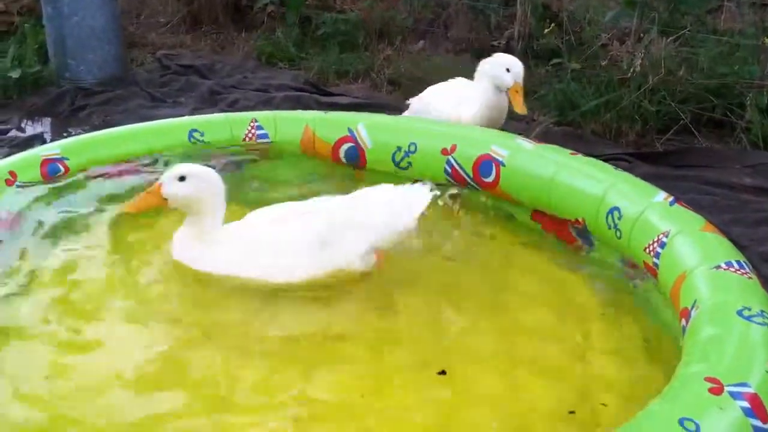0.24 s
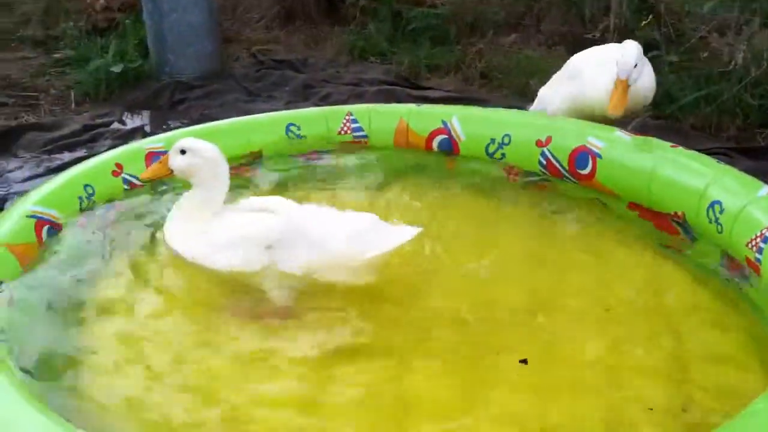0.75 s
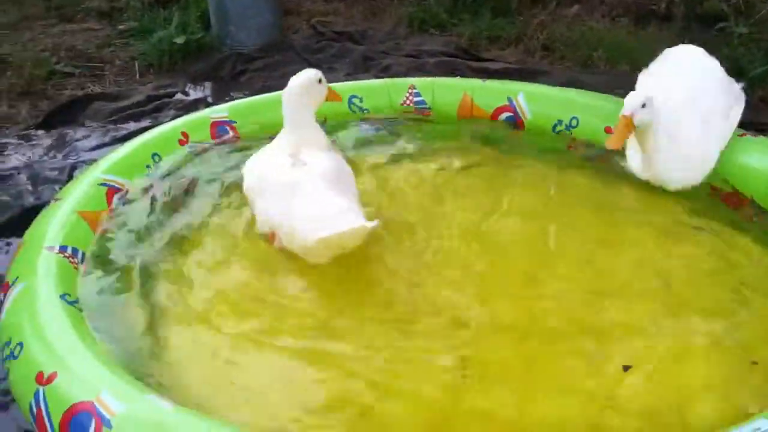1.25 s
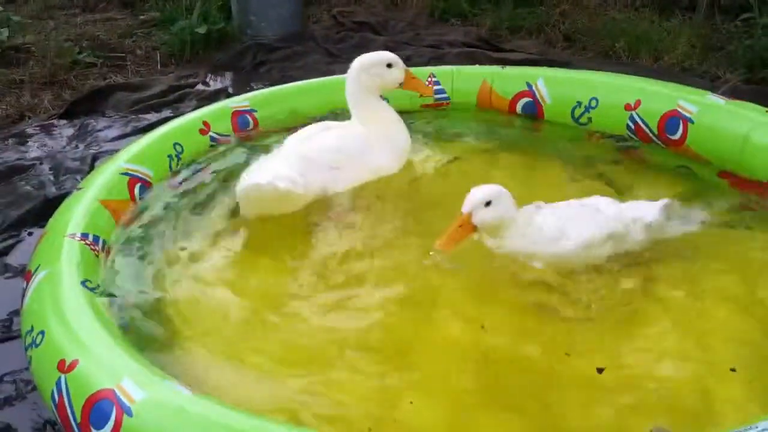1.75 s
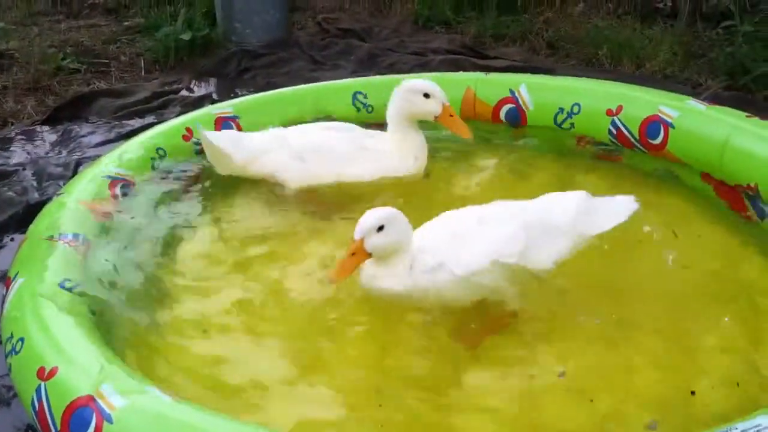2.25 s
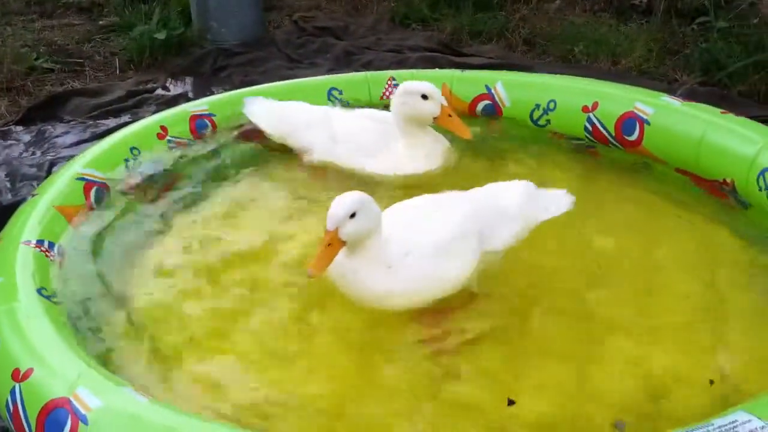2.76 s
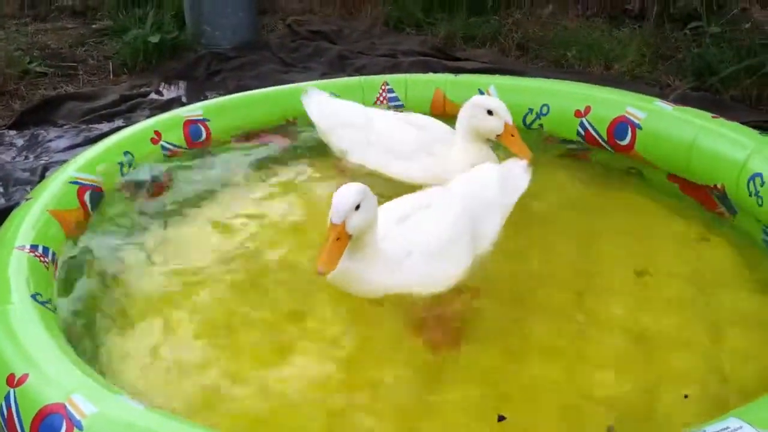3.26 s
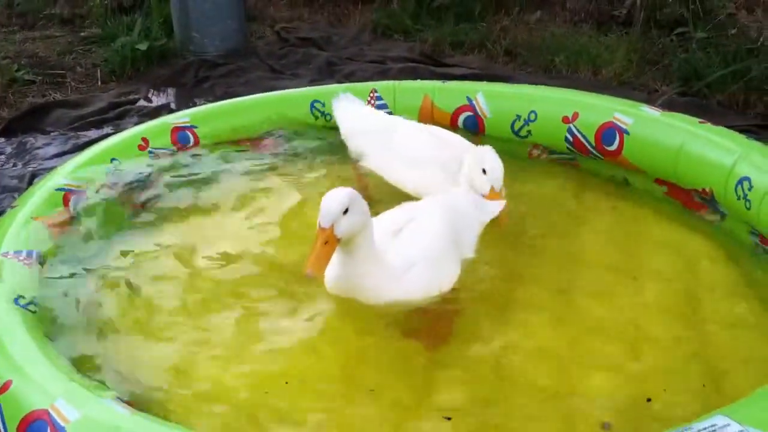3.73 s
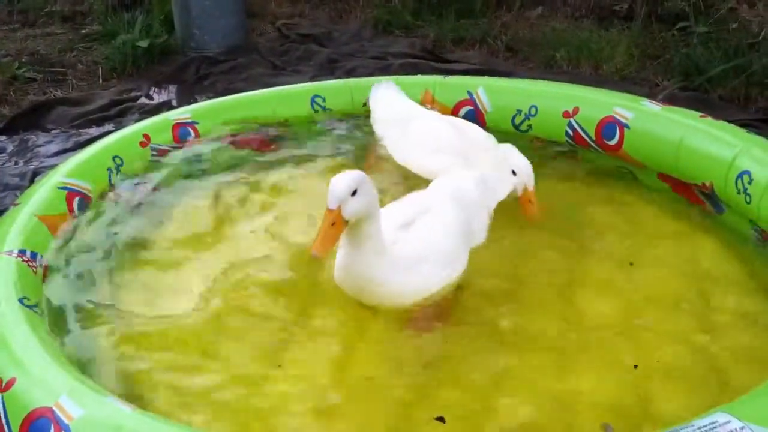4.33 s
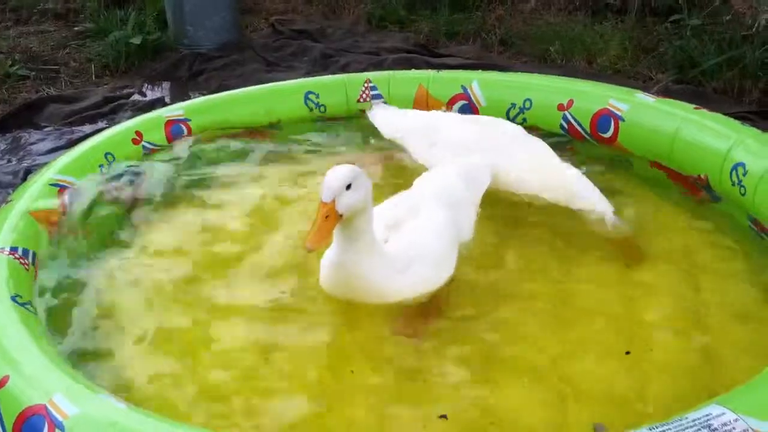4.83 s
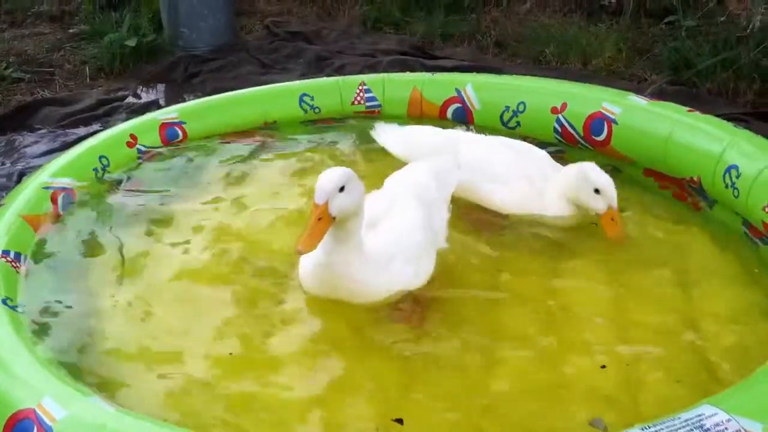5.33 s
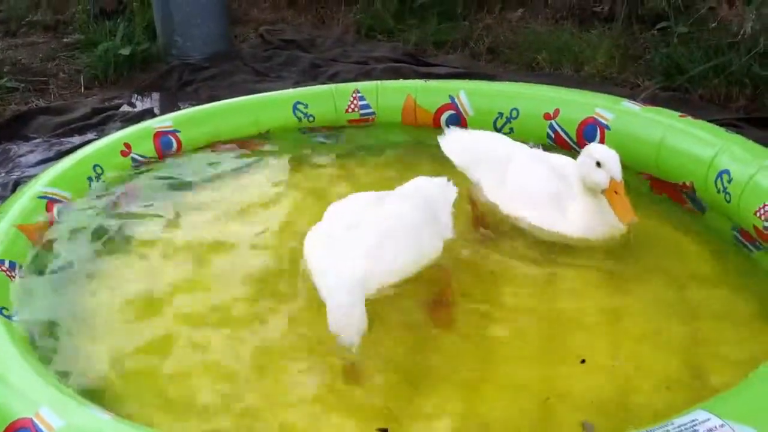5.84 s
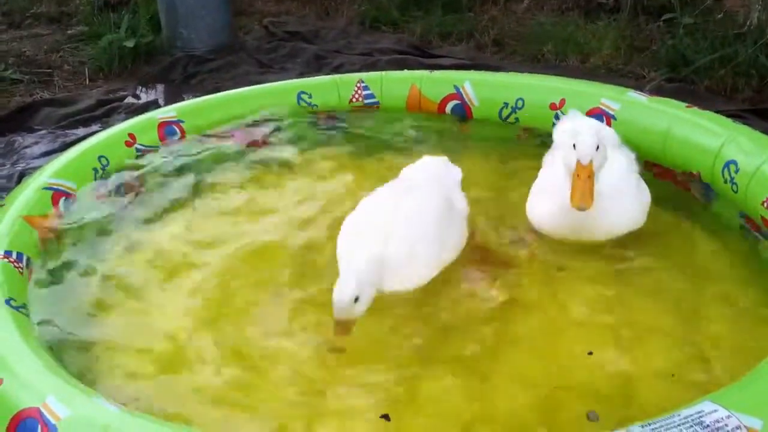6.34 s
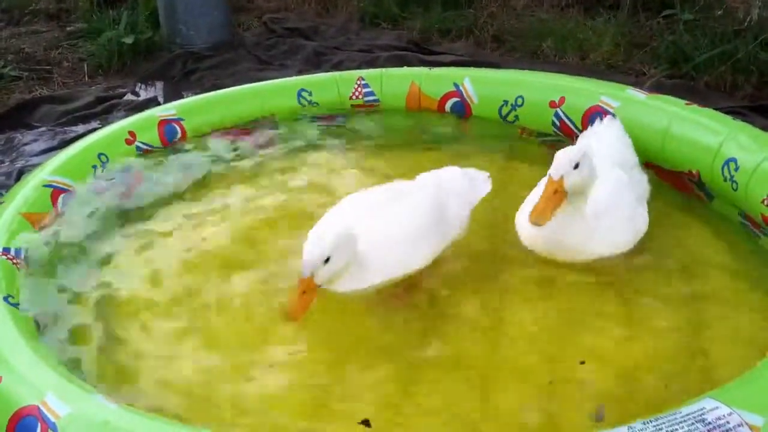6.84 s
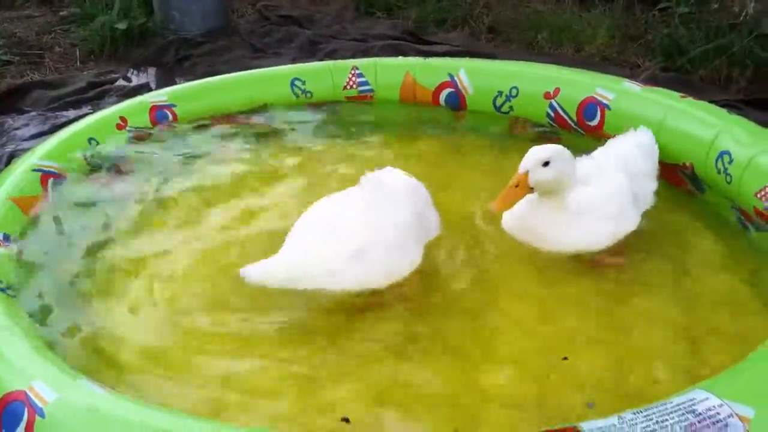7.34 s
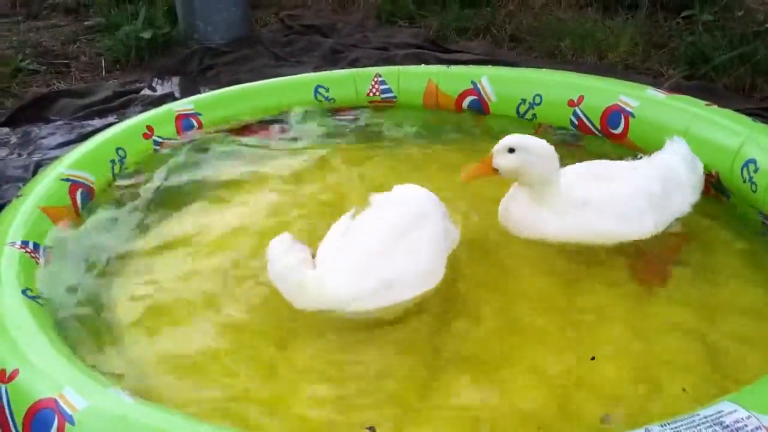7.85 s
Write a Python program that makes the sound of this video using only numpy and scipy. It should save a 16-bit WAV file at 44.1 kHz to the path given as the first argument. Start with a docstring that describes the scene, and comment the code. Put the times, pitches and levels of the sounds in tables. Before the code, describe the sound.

Two ducks splash, bubble and peep in a small garden pool, with low clucks and a distant rooster, before the water calms under buzzing cicadas.

```python
"""Close to an inflatable pool in a garden: two young ducks, one swimming, one sliding in over the vinyl rim.
From the start bubbles ring, droplets slap and bills click; whistled peeps arch up and break.
A small bird and trilling bush crickets join in, then low pulsed clucks and a far rooster's rising crow.
The water calms once both ducks are afloat; later peeps go on and clicking cicadas swell to a buzz.
A faint low hum and shaped noise for the garden air lie under it all."""
import sys
import numpy as np
from scipy import signal
from scipy.fft import rfft, irfft, next_fast_len
from scipy.io import wavfile

SR = 44100
rng = np.random.default_rng(int(sys.argv[2]) if len(sys.argv) > 2 else 0)


def wav_record(signal):
    """Record a signal, one row per channel, as 16-bit PCM in the file named by sys.argv[1]."""
    frames = np.transpose(np.atleast_2d(signal))
    bounded = np.clip(frames, -1, 1)
    # unit amplitude maps onto the largest positive 16-bit level
    quanta = np.round(bounded * 32767).astype(np.int16)
    wavfile.write(sys.argv[1], SR, quanta)


N = 356328
TIME = np.arange(N) / SR


def from_db(db):
    """Decibels to gain."""
    return 10 ** (np.asarray(db) / 20)


def rms_one(x):
    """Scale to unit power."""
    return x / np.sqrt(np.mean(x ** 2) + 1e-20)


def in_time(rows, t=TIME):
    """Columns of a curve table, joined by straight lines."""
    s, *columns = np.transpose(rows)
    return [np.interp(t, s, column) for column in columns]


def add(out, s, sound):
    """Mix a sound in at time s."""
    i = max(int(s * SR), 0)
    out[i:i + len(sound)] += sound[:max(N - i, 0)]


def cut(x, hz, kind, order=2):
    """Butterworth filter."""
    sos = signal.butter(order, np.clip(hz, 10, .45 * SR), kind, fs=SR, output="sos")
    return signal.sosfilt(sos, x)


def slow_noise(hz, size=N):
    """Random wobble up to the given rate, spread 1."""
    run_in = SR // 4
    return rms_one(cut(rng.standard_normal(size + run_in), hz, "low")[-size:])


def coloured(x, spectrum):
    """Give a steady sound a spectrum, falling off beyond both ends of the curve; rms 1."""
    hz, db = np.transpose(spectrum)
    size = next_fast_len(N)
    f = np.maximum(np.fft.rfftfreq(size, 1 / SR), 1)
    gain = from_db(np.interp(np.log(f), np.log(hz), db))
    gain = gain * np.minimum(f / hz[0], 1) * np.minimum(hz[-1] / f, 1)
    return rms_one(irfft(rfft(x, size) * gain, size)[:N])


def resonate(x, resonances):
    """Parallel two-pole resonances of (Hz, width Hz, dB)."""
    out = 0
    for hz, width, db in resonances:
        r = np.exp(-np.pi * width / SR)
        poles = [1, -2 * r * np.cos(2 * np.pi * hz / SR), r * r]
        out = out + from_db(db) * (1 - r * r) / 2 * signal.lfilter([1, 0, -1], poles, x + 1e-18)
    return out


def sine(hz):
    """A sine that follows a pitch contour."""
    return np.sin(2 * np.pi * np.cumsum(hz) / SR)


def ping(hz, t60, rise=0, sag=0):
    """A dying sine that starts sharp by the share `sag`, settles, and climbs by `rise` per t60."""
    t = np.arange(int(1.3 * t60 * SR) + 2) / SR
    return from_db(-60 * t / t60) * sine(hz * (1 + sag * np.exp(-8 * t / t60) + rise * t / t60))


def whistled(hz, db, taper, waver):
    """A tone along a pitch contour, faded in and out, wavering slightly."""
    pitch = hz * (1 + waver * slow_noise(58, size=SR)[:len(hz)])
    return from_db(db) * signal.windows.tukey(len(hz), taper) * sine(pitch)


def hum(hz=118.4, level_db=-85.5):
    """One low tone of steady pitch, its level barely wavering."""
    return from_db(level_db + slow_noise(2)) * np.sqrt(2) * np.sin(2 * np.pi * hz * TIME)


def garden_air(level_db=-64.5):
    """Still air: steady noise with a fixed spectrum."""
    # spectrum of the air: f/Hz, relative level/dB
    air_curve = [(30, -20), (70, -38), (110, 4), (150, 1.5), (230, 4), (400, -2), (800, -3), (3300, -6.5),
                 (4400, 3.5), (5400, -2), (6300, -10.5), (9500, -6.5), (12000, -7.5), (14000, -6),
                 (15500, -25)]
    return from_db(level_db) * coloured(rng.standard_normal(N), air_curve)


def bush_cricket(trill_hz=5150, width_hz=220, trill_db=-67, chorus_db=-73):
    """Each rub of the wings swells and fades in one narrow resonance; farther insects blend steadily."""
    # runs of trills: start t/s, end t/s
    runs = [(.88, 1.2), (2.06, 2.2), (2.8, 3.3), (3.56, 4.05)]
    every_s, trill_s = 0.204, 0.14
    swell = np.zeros(N)
    for start, end in runs:
        for s in np.arange(start, end, every_s):
            add(swell, s, from_db(trill_db) * signal.windows.tukey(int(trill_s * SR), .6))
    wing, far_wings = [(trill_hz, width_hz, 0)], [(4540, 300, 0), (5190, 460, -1)]
    # passing each resonance twice narrows it
    trill = rms_one(resonate(resonate(rng.standard_normal(N), wing), wing))
    chorus = rms_one(resonate(resonate(rng.standard_normal(N), far_wings), far_wings))
    return swell * trill + from_db(chorus_db) * chorus


def tymbals(rate, alternate, unsteady):
    """Two tymbals click in turn, unequal and slightly uneven; rms 1."""
    turns = np.cumsum(rate * (1 + unsteady * slow_noise(18))) / SR + .002 * slow_noise(90)
    strength = 1 + alternate * (-1) ** np.floor(turns)
    return rms_one(np.diff(np.floor(turns), prepend=0) * strength)


def smear(x, spread_s):
    """Foliage delays each frequency by its own amount, blurring clicks into a drone."""
    size = next_fast_len(N + SR // 4, real=True)
    spectrum = rfft(x, size)
    knots = np.arange(0, len(spectrum), 400)
    delay = spread_s * np.interp(np.arange(len(spectrum)), knots, rng.random(len(knots)))
    return irfft(spectrum * np.exp(-2j * np.pi * np.cumsum(delay) * SR / size), size)[:N]


def cicada(sizzle_db=-14, flutter_db=1.8, ribs_db=-4):
    """Clicks of two cicadas, each fluttering in level, ring their bodies; buckling ribs sizzle on top."""
    # surges, full effort and a late easing off, ahead of the body and rib shares: t/s, level/dB
    effort = [(3.97, -73), (4.01, -61), (4.2, -65), (4.24, -56), (4.33, -59), (4.43, -51), (4.54, -53),
              (4.68, -56), (4.76, -56), (4.87, -56), (5.05, -57), (6.0, -56), (7.2, -56.5), (7.6, -57),
              (8.08, -57)]
    # the louder cicada's tymbals: t/s, rate/(clicks per s)
    click_rate = [(4.73, 321), (5.0, 319.2), (5.25, 316.6), (5.5, 317.4), (5.75, 318.8), (6.1, 314.9),
                  (6.7, 315.2), (7.1, 316.7), (7.35, 317), (7.6, 318.2), (8.08, 318.2)]
    # resonances of the bodies: f/Hz, width/Hz, level/dB
    body_modes = [(4070, 64, -2), (4160, 110, -16), (4500, 39, -22), (4809, 160, 3.5), (4900, 120, -10),
                  (5080, 120, 1.5), (6100, 2900, -30.5), (7400, 200, -24), (9160, 1000, -9)]
    # resonances of the buckling ribs: f/Hz, width/Hz, level/dB
    rib_modes = [(8790, 110, -6), (8950, 35, 3), (9130, 100, -6), (9390, 19, 2.5), (9550, 35, 1.5),
                 (9750, 22, 0), (9850, 70, -5.5), (10020, 25, 5.5), (13040, 100, -1), (13300, 570, -9.5),
                 (13850, 150, -5), (14100, 120, -5)]
    rate, = in_time(click_rate)
    buzz_db, = in_time(effort)
    # the clicks come to stand out from the noise
    ragged, locked, lock_at_s, lock_s = 0.14, 0.7, 4.67, 0.06
    click_gain = ragged + (locked - ragged) * np.clip((TIME - lock_at_s) / lock_s, 0, 1)
    first = tymbals(rate, alternate=0.25, unsteady=0.0008)
    # the second is fainter and clicks slightly slower
    second = from_db(-1.5) * tymbals(.964 * rate, alternate=0.15, unsteady=0.003)
    clicks = sum(from_db(flutter_db * slow_noise(12)) * smear(one, spread_s=0.025) for one in (first, second))
    drive = click_gain * clicks + from_db(sizzle_db) * rng.standard_normal(N)
    body = rms_one(cut(resonate(drive, body_modes), 3960, "high", order=8))
    ribs = rms_one(cut(resonate(rng.standard_normal(N), rib_modes), 8200, "high", order=6))
    return (from_db(-2.5) * body + from_db(ribs_db) * ribs) * from_db(buzz_db)


def rooster():
    """Distance leaves the two lowest partials of a long rising, swelling note and short falling ones."""
    # notes of the crow: t/s, length/s, start f/Hz, end f/Hz, level/dB, swell/dB, octave level/dB
    notes = [(2.307, 0.86, 635, 867, -71.5, 11, -14), (3.137, 0.086, 786, 765, -57, -8, -5),
             (3.342, 0.1006, 700, 580, -63.5, -1.5, -5), (4.05, 0.11, 865, 784, -79.5, -9, 12)]
    out = np.zeros(N)
    for s, length, start_hz, end_hz, db, swell_db, octave_db in notes:
        u = np.linspace(0, 1, min(int(length * SR), SR))
        hz, level_db = start_hz + (end_hz - start_hz) * u, db + swell_db * u
        add(out, s, whistled(hz, level_db, taper=0.13, waver=0.0072))
        add(out, s, whistled(2 * hz, level_db + octave_db, taper=0.54, waver=0.0043))
    return out


def songbird(count=6, note_db=-59.5, slur_db=-60.5):
    """Each bout is six level whistled notes, about five a second, with a swinging slur between each two."""
    # bouts: first note t/s, last note t/s, top f/Hz
    bouts = [(1.18, 2.13, 2760), (4.204, 5.144, 2755), (5.63, 6.608, 2830), (6.742, 7.697, 2735)]
    note_s, note_share = 0.067, .928  # pitch as a share of the top
    slur_after_s, slur_s, slur_skew, slur_drop = .11, .077, 1.203, 0.17
    out, u = np.zeros(N), np.linspace(0, 1, int(slur_s * SR))
    # the slur swings up to the top, then dips by slur_drop
    slur = 1 - slur_drop * (1 - np.sin(2 * np.pi * u ** slur_skew)) / 2
    note = np.full(int(note_s * SR), note_share)
    for first, last, top_hz in bouts:
        times = np.linspace(first, last, count)
        for s in times:
            add(out, s, whistled(top_hz * note, note_db, taper=0.88, waver=0.0098))
        for s in times[:-1]:
            add(out, s + slur_after_s, whistled(top_hz * slur, slur_db, taper=0.26, waver=0.013))
    return out


def pool_wall(slosh_db=-21.5, slosh_t60=0.74):
    """Wet vinyl scuffs in gritty bursts and booms softly when kicked; the water behind it rumbles on."""
    # feet and bodies on the vinyl: t/s, length scale/s, level/dB, dull above f/Hz
    scuffs = [(0.18, 0.055, -51, 6300), (0.639, 0.082, -55, 170), (0.66, 0.016, -51.5, 7500),
              (0.8495, 0.0056, -40, 1200), (1.009, 0.019, -45, 1600), (1.127, 0.008, -42, 1240),
              (1.206, 0.04, -42.5, 1670), (1.232, 0.071, -46, 400), (1.252, 0.053, -51, 8200),
              (1.294, 0.018, -44, 1500), (1.366, 0.015, -36.5, 1100), (1.374, 0.018, -42, 7200),
              (1.4, 0.02, -48, 2220), (1.535, 0.06, -47.5, 2600)]
    # kicks against the pool: t/s, level/dB
    kicks = [(1.242, -41), (1.377, -45), (6.1139, -39.5), (6.1197, -38)]
    # modes of the air-filled wall: f/Hz, level/dB, t60/s
    wall_modes = [(130.4, -15.5, 0.21), (196, -8, 0.12), (277, 2, 0.054), (304, -0.5, 0.026),
                  (404, -39, 0.027), (810, -15, 0.02)]
    out, t = np.zeros(N), np.arange(SR // 2) / SR
    for s, length, db, dull_hz in scuffs:
        u = np.arange(SR // 8) / SR / length
        grit = rng.standard_normal(len(u)) * from_db(1.7 * slow_noise(360, size=len(u)))
        rub = cut(cut(grit, dull_hz, "low") + from_db(-23.5) * grit, 136, "high")
        add(out, s, from_db(db) * rms_one(rub) * np.minimum(u / 0.28, 1) * np.exp(-1.3 * u ** 2))
    for s, db in kicks:
        slosh = rms_one(cut(rng.standard_normal(len(t)), [190, 370], "band")) * from_db(-60 * t / slosh_t60)
        add(out, s, from_db(db + slosh_db) * slosh)
        for hz, mode_db, t60 in wall_modes:
            add(out, s, from_db(db + mode_db) * ping(hz, t60))
    return out


def grains(per_s, low_hz, high_hz, cycles, spread_db):
    """A swarm of small bubbles of random size and pitch; rms 1."""
    out = np.zeros(N)
    for when, pitch, size, life in rng.random((int(per_s * N / SR), 4)):
        hz = low_hz * (high_hz / low_hz) ** pitch
        level = from_db(-spread_db * np.log(size + 0.0094))
        add(out, when * N / SR, level * ping(hz, cycles * (.5 + life) / hz, rise=0.22))
    return rms_one(out)


def water(clump_db=4.0, wash_db=-10):
    """Feet churn the pool, waves lap with clumps of chirping bubbles, spray falls; all calms once afloat."""
    # deep churning of paddling feet, ahead of trim and calming: t/s, level/dB
    paddling = [(0.0, -65), (0.53, -73.5), (0.85, -61.5), (1.59, -70), (1.74, -57), (1.91, -69.5),
                (2.14, -90), (2.51, -72.5), (2.69, -62), (2.96, -70), (3.4, -80)]
    # splashing at the surface, ahead of trims and calming: t/s, lapping level/dB, spray level/dB
    surface = [(0.0, -57.5, -62), (0.4, -56.5, -64.5), (0.57, -56, -66.5), (0.71, -65.5, -71.5),
               (0.82, -62.5, -64.5), (1.06, -61, -69.5), (1.26, -63, -74), (1.37, -59, -69),
               (1.59, -54.5, -66), (1.76, -48.5, -59), (1.93, -59.5, -68), (2.22, -61, -65),
               (2.58, -64, -67), (2.73, -51.5, -61), (2.82, -60, -61.5), (3.2, -69, -74), (3.6, -77, -71),
               (7.6, -74, -78), (7.72, -56, -78), (7.95, -65, -78)]
    # spectra of churn, lapping and spray noise: f/Hz, relative level/dB
    churn_curve = [(50, 6.5), (90, -8), (130, -3), (300, -3.5), (500, -6), (900, -19), (2000, -30)]
    lapping_curve = [(300, -3), (700, -10), (1200, -9), (2700, 16), (3900, 8), (6000, -44), (12000, -2)]
    spray_curve = [(2000, -9), (4500, 8.5), (6500, 0), (8500, 10.5), (11000, -4), (15000, 10)]
    churn_trim_db, lapping_trim_db, spray_trim_db = 1.5, 0.5, 1.5
    afloat_s, settle_s, calm_db = 2.68, 0.29, -9.5
    churn_db, = in_time(paddling)
    lapping_db, spray_db = in_time(surface)
    settling = from_db(calm_db * np.clip((TIME - afloat_s) / settle_s, 0, 1))
    white = rng.standard_normal((3, N))
    churn = coloured(white[0], churn_curve) * from_db(5.3 * slow_noise(21.3))
    froth = grains(per_s=850, low_hz=800, high_hz=4600, cycles=46, spread_db=3.4)
    mist = grains(per_s=700, low_hz=4700, high_hz=13000, cycles=28, spread_db=3.3)
    clumps = from_db(clump_db * np.clip(slow_noise(31.6), -2, 2))
    ripple_db = 6 * np.tanh(slow_noise(94) / 1.3)
    wash = from_db(wash_db + ripple_db) * coloured(white[1], lapping_curve)
    lapping = wash + from_db(-3.5) * clumps * froth
    spray = from_db(1.5) * coloured(white[2], spray_curve) + clumps * mist
    mix = from_db(churn_trim_db + churn_db) * churn
    mix += from_db(lapping_trim_db + lapping_db) * lapping
    mix += from_db(spray_trim_db + spray_db) * spray
    return settling * mix


def gurgles():
    """A pocket of air opens to the surface and changes size, so its note sweeps ever faster, mostly up."""
    # gurgles at a dabbling bill or paddling foot: t/s, length/s, start f/Hz, end f/Hz, level/dB, fade/dB
    pockets = [(0.168, 0.022, 1255, 1610, -50, -2), (0.203, 0.019, 1640, 2120, -32.5, -16),
               (0.245, 0.018, 3000, 2400, -51, -3), (0.227, 0.032, 711, 1270, -50.5, 0),
               (0.263, 0.022, 1126, 1750, -47, -4), (1.921, 0.0092, 2450, 2650, -46.5, 1),
               (2.03, 0.013, 1330, 1600, -58, -7), (2.076, 0.02, 826, 1540, -48, -9),
               (2.128, 0.025, 855, 1310, -56.5, 5), (2.174, 0.013, 1250, 1120, -53, 1),
               (2.432, 0.015, 1700, 1950, -47, -7), (5.803, 0.1, 697, 1700, -51.5, -24),
               (6.55, 0.031, 1000, 3040, -65, 13), (7.838, 0.0082, 880, 2000, -48.5, -10),
               (7.862, 0.0079, 1050, 1700, -55, -4)]
    out = np.zeros(N)
    for s, length, start_hz, end_hz, db, fade_db in pockets:
        u = np.linspace(0, 1, int(length * SR))
        pitch = start_hz + (end_hz - start_hz) * u ** 2.8
        add(out, s, from_db(db + fade_db * u) * signal.windows.tukey(len(u), .1) * sine(pitch))
    return out


def plops(rows, rise, slap_t60, onset_s, reach_hz):
    """Each impact slaps the surface, and the air it traps rings, sharp at first."""
    out, t = np.zeros(N), np.arange(SR // 30) / SR
    for s, db, hz, cycles, slap_db in rows:
        noise = rng.standard_normal(len(t))
        slap = rms_one(cut(noise, [hz / 1.34, hz + reach_hz], "band", order=3))
        slap = slap * from_db(slap_db - 60 * t / slap_t60)
        for part in (slap, ping(hz, cycles / hz, rise, sag=0.099)):
            onset = np.minimum(np.arange(len(part)) / SR / onset_s, 1)
            add(out, s, from_db(db) * part * onset)
    return out


def bubbles(trim_db=0.5):
    """Single air bubbles, large and small, ring at the pitch of their size."""
    # bubbles, ahead of the trim: t/s, level/dB, f/Hz, ringing/cycles, slap level/dB
    single = [(0.0, -33, 913, 39, -2.5), (0.0085, -26, 850, 12.5, -12), (0.0114, -24.5, 2740, 30, -4),
              (0.032, -45, 3700, 35, -8), (0.1375, -37, 3560, 34, -3), (0.156, -42, 2830, 50, -10),
              (0.1685, -39, 1100, 13, 3), (0.1989, -19, 1810, 32, -2.5), (0.2325, -35, 3650, 46, -10),
              (0.2415, -37, 4000, 30, -5), (0.2505, -35, 1070, 26, -1), (0.3282, -35.5, 2720, 48, -14),
              (0.333, -39, 1580, 35, -12), (0.371, -33, 1120, 19, -20), (0.4035, -33, 2080, 26, -21),
              (0.405, -36, 877, 25, -9), (0.5145, -39.5, 1860, 26, -5.5), (0.617, -46, 2550, 35, -12),
              (0.629, -50, 3100, 32, -14), (0.6395, -44, 3120, 40, -14), (0.8513, -16.5, 2550, 41, -9.5),
              (0.8952, -34, 2540, 30, -3), (0.979, -46, 2400, 45, -13), (0.9949, -28.5, 3160, 41, -18),
              (1.218, -38, 1150, 25, -10), (1.232, -41, 814, 20, -12), (1.2425, -46, 510, 10, -14),
              (1.303, -39, 700, 14, -2.5), (1.368, -27, 1020, 21, -9), (1.66, -24.5, 2250, 54, -9.5),
              (1.672, -35.5, 1120, 17, -10), (1.6975, -37, 2010, 25, -4), (1.712, -33.5, 3200, 20, 1.5),
              (1.738, -36, 1410, 22, -8), (1.7415, -32, 4200, 35, -10), (1.7475, -33, 3660, 40, -7),
              (1.753, -23, 1930, 22, -14), (1.759, -31, 3370, 30, -7), (1.782, -39, 2550, 35, -1),
              (1.7935, -34.5, 1750, 40, 0), (1.807, -34, 1000, 47, -4), (1.8565, -31.5, 1180, 36, -24),
              (1.868, -31.5, 1700, 32, -9), (2.178, -44, 1170, 8.9, 6.5), (2.194, -38, 930, 98, 1),
              (2.226, -41, 2120, 32, -3), (2.244, -40, 1660, 60, -2.5), (2.34, -35, 2940, 73, -14),
              (2.3535, -35, 1927, 100, -2), (2.507, -41.5, 824, 100, -4), (2.6045, -47, 1810, 60, 2),
              (2.6545, -36.5, 2160, 48, -12), (2.6615, -40, 3280, 45, -14), (2.6715, -34, 2220, 12, -6),
              (2.711, -41, 3060, 35, -10), (2.729, -40, 3330, 46, -6), (2.744, -39, 3180, 33, -3),
              (2.911, -41, 2850, 19, -9), (3.9981, -46.5, 3000, 56, -10), (5.5494, -41, 3220, 30, 0),
              (5.6326, -45, 2080, 46, -0.5), (5.963, -53, 880, 17, -12), (5.979, -49, 3140, 40, -16),
              (6.19, -43, 3670, 45, -12), (6.723, -51, 910, 99, -14), (6.7441, -43.5, 2510, 33, -11),
              (7.915, -52, 1030, 28, -3)]
    ringing = plops(single, rise=0.033, slap_t60=0.016, onset_s=0.0004, reach_hz=2280)
    return from_db(trim_db) * cut(ringing, 4070, "low", order=4)


def drops(trim_db=-1, cycles=41, slap_db=-7):
    """Droplets strike the surface with a bright slap and a short high ring."""
    # droplets, ahead of the trim: t/s, level/dB, f/Hz
    strikes = [(0.0116, -23, 6930), (0.1377, -27.5, 9400), (0.2033, -27, 6900), (0.3812, -35, 6560),
               (0.5757, -36.5, 6960), (0.7588, -31, 5900), (1.385, -32, 6700), (1.6677, -28, 6570),
               (1.7115, -29.5, 7000), (1.929, -35, 5300), (2.0844, -41, 6350), (2.1932, -31.5, 7600),
               (2.2544, -32, 8400), (2.38, -29.5, 7100), (0.1565, -35, 7200), (2.179, -39, 3940),
               (2.354, -37.5, 8600), (2.6206, -33.5, 8400), (5.8596, -42, 9200), (7.4685, -39, 6550)]
    rows = [(s, db, hz, cycles, slap_db) for s, db, hz in strikes]
    ringing = plops(rows, rise=0.028, slap_t60=0.015, onset_s=0.00023, reach_hz=8000)
    return from_db(trim_db) * cut(ringing, 2600, "high")


def nibbles():
    """The bill snaps shut with a dry, woody click: a few quickly damped modes."""
    # clicks of the nibbling bill: t/s, level/dB
    snaps = [(0.0714, -34.5), (3.7056, -53), (3.7546, -32), (3.7755, -58), (3.796, -47), (3.8396, -44)]
    # modes of the bill: f/Hz, level/dB, t60/s
    bill_modes = [(1000, -17.5, 0.011), (1640, -4.5, 0.006), (2270, -2.5, 0.008), (3100, -22, 0.0034)]
    out = np.zeros(N)
    for s, db in snaps:
        for hz, mode_db, t60 in bill_modes:
            add(out, s, from_db(db + mode_db) * ping(hz, t60))
    return out


def peeps(overtone_db=-21, rasp_hz=450, breaking_db=4, hiss_db=-20, top_dip_db=1.0):
    """A whistle arches up and down, breaks into a hoarse flutter, then comes back at another level."""
    # peeps: t/s, length/s, top f/Hz, level/dB, share of length at the break, share broken, return level/dB
    calls = [(0.341, 0.095, 2137, -39, 0.32, 0.3, -8), (0.525, 0.11, 2250, -38.5, 0.39, 0.26, -3.5),
             (0.73, 0.095, 2220, -39, 0.45, 0.17, -6.5), (2.492, 0.1, 2070, -42.5, 0.48, 0.12, -7),
             (2.673, 0.1, 2400, -42, 0.44, 0.22, -3.5), (2.857, 0.1, 2424, -36, 0.31, 0.39, -2.5),
             (5.303, 0.092, 2170, -41, 0.28, 0.26, -12), (5.466, 0.1, 2260, -42.5, 0.6, 0.066, 0),
             (5.64, 0.1, 2275, -39.5, 0.33, 0.49, -6), (8.057, 0.1, 2070, -42.5, 0.23, 0.24, -8)]
    low_hz, skew, rasp = 761.6, 1.18, 0.18
    # a low voice beats against the whistle as it breaks, and the breath comes unevenly
    growl_hz, growl_depth, break_db, uneven_db = 215, 0.8, -20, 2.5
    out = np.zeros(N)
    for s, length, top_hz, db, breaks_at, broken_for, back_db in calls:
        u = np.linspace(0, 1, int(length * SR))
        flutter, shake, waver = (slow_noise(hz, size=SR // 4)[:len(u)] for hz in (150, rasp_hz, 82))
        arch = np.sin(np.pi * u ** skew)
        pitch = (low_hz + (top_hz - low_hz) * arch) * (1 + 0.039 * rasp * flutter)
        phase = 2 * np.pi * np.cumsum(pitch) / SR
        broken, back = (np.clip(.5 + (u - at) / 0.15, 0, 1) for at in (breaks_at, breaks_at + broken_for))
        level = from_db(db) * np.clip(u / 0.12, 0, 1) * np.clip((1 - u) / 0.3, 0, 1)
        voice_db = (broken - back) * (break_db + breaking_db * waver) + back * back_db
        voice_db = voice_db - top_dip_db * arch ** 6 + uneven_db * np.tanh(waver)
        growling = np.clip(1 + (u - breaks_at) / 0.12, 0, 1) * (1 - back)
        growl = 1 + growl_depth * growling * np.sin(2 * np.pi * growl_hz * length * u + flutter)
        tone = np.sin(phase) * (1 + rasp * shake) + from_db(overtone_db) * np.sin(2 * phase)
        whistle = growl * from_db(voice_db) * tone
        hiss = rms_one(cut(rng.standard_normal(SR // 4), [1000, 2400], "band"))[:len(u)]
        add(out, s, level * (whistle + from_db(hiss_db) * arch ** 2 * (1 - back) * hiss))
    return out


def clucks(rasp_db=-21, rasp_t60=0.008, edge=0.9):
    """A few raspy, quickening pulses, swelling and fading, ring a throat shaped anew each time."""
    # low clucks: t/s, peak level/dB, length/s, dull above f/Hz, thin below f/Hz
    calls = [(1.8336, -19.5, 0.014, 2800, 420), (2.2862, -24.5, 0.018, 2000, 170),
             (2.4654, -26, 0.018, 1900, 170), (2.6175, -25.5, 0.018, 2100, 160),
             (2.8278, -22, 0.026, 3000, 170)]
    # mean resonances of the duck's throat: f/Hz, width/Hz, level/dB
    throat_modes = [(265, 143, 9), (341, 72, 8.5), (580, 220, 0), (990, 205, 10), (1360, 160, -18),
                    (1870, 150, -0.5), (2230, 160, -13), (3800, 470, 1)]
    start_hz, end_hz = 214.5, 324  # pulse rate
    out = np.zeros(N)
    t = np.arange(SR // 10) / SR
    for s, db, length, dull_hz, thin_hz in calls:
        u = np.minimum(t / length, 1)
        turns = np.floor(np.cumsum(start_hz + (end_hz - start_hz) * u ** 2) / SR)
        pulses = np.diff(turns, prepend=-1) * (u < 1) * (edge + np.sin(np.pi * u))
        puffs = signal.fftconvolve(pulses, from_db(rasp_db - 60 * t / rasp_t60))[:len(t)]
        rasp = puffs * cut(rng.standard_normal(len(t)), 1000, "high")
        throat = [(hz * (1 + 0.039 * rng.standard_normal()), width, level) for hz, width, level in throat_modes]
        voice = cut(cut(resonate(pulses + rasp, throat), thin_hz, "high"), dull_hz, "low")
        voice = cut(voice, 4800, "low", order=6)
        add(out, s, from_db(db) * voice / np.abs(voice).max())
    return out


def garden(x, t60, dull_hz):
    """Scattered echoes from the ground, fence and trees: sparse random taps that die away."""
    t = np.arange(SR // 2) / SR
    taps = rng.standard_normal(len(t)) * (rng.random(len(t)) < .05) * (t > .004)
    echoes = cut(taps * from_db(-60 * t / t60), dull_hz, "low")
    return signal.fftconvolve(x, echoes / np.sqrt(np.sum(echoes ** 2)))[:N]


def scene():
    """The pool is near and dry, the birds far and echoing, over still garden air."""
    far = songbird() + rooster()
    near = pool_wall() + gurgles() + bubbles() + drops() + nibbles() + peeps() + clucks()
    near_echoes = from_db(-17.5) * garden(near, t60=0.095, dull_hz=5800)
    far_echoes = from_db(-8.5) * garden(far, t60=0.51, dull_hz=3950)
    background = hum() + garden_air() + bush_cricket() + cicada()
    return (background + far + far_echoes + water() + near + near_echoes)[None]


def record(dry):
    """The microphone loses the deep bass and dulls the highest treble; the top is cut steeply."""
    coloured_by_mic = cut(cut(dry, 94.0, "high", order=4), 10500, "low", order=3)
    cutoff_hz = 15200
    return signal.sosfilt(signal.ellip(10, .2, 70, cutoff_hz, fs=SR, output="sos"), coloured_by_mic)


dry = scene()
out = record(dry)
wav_record(out)
```